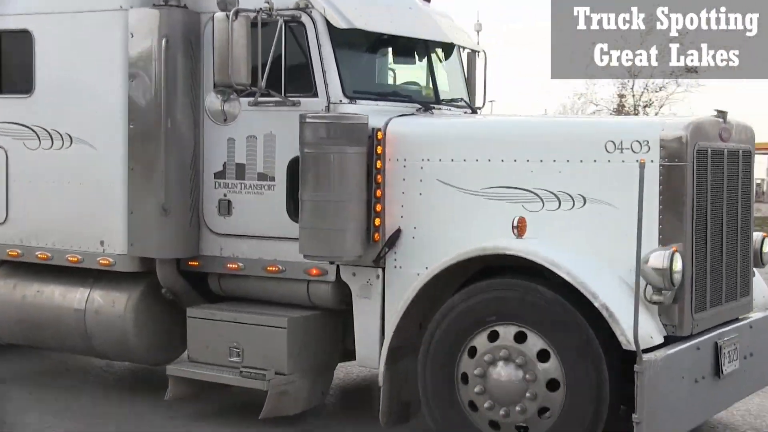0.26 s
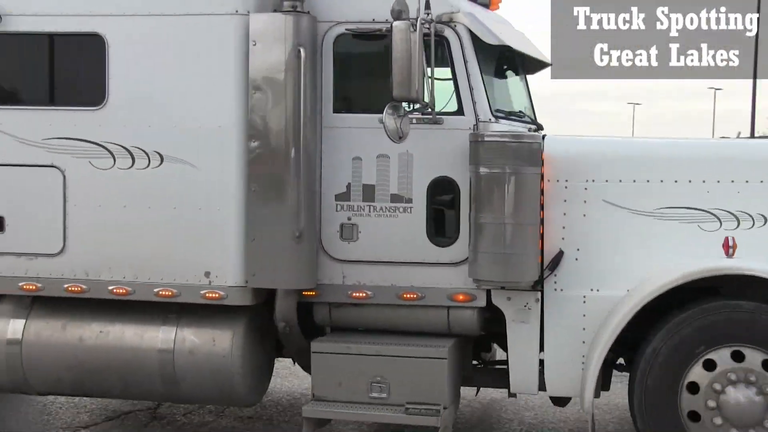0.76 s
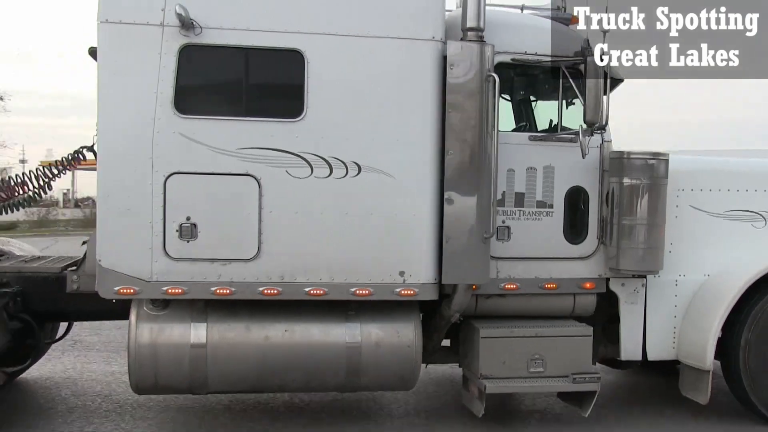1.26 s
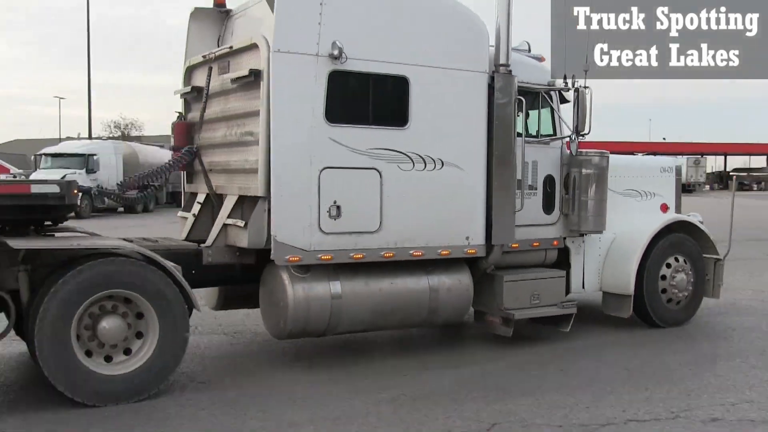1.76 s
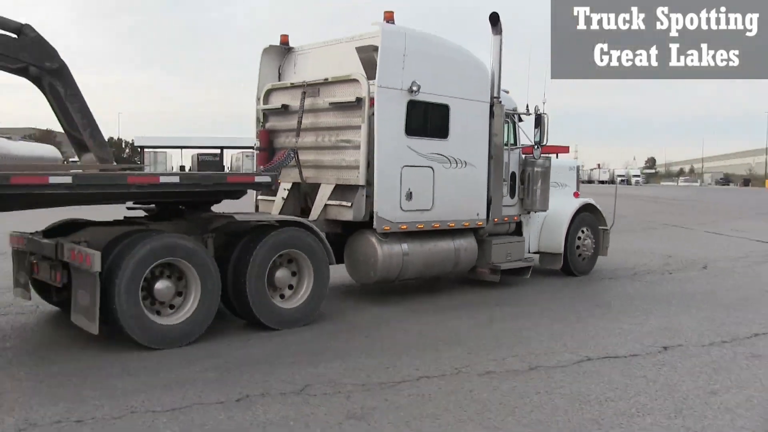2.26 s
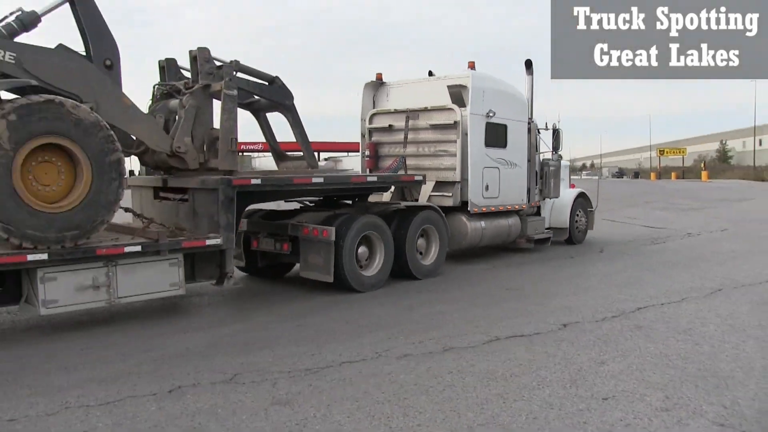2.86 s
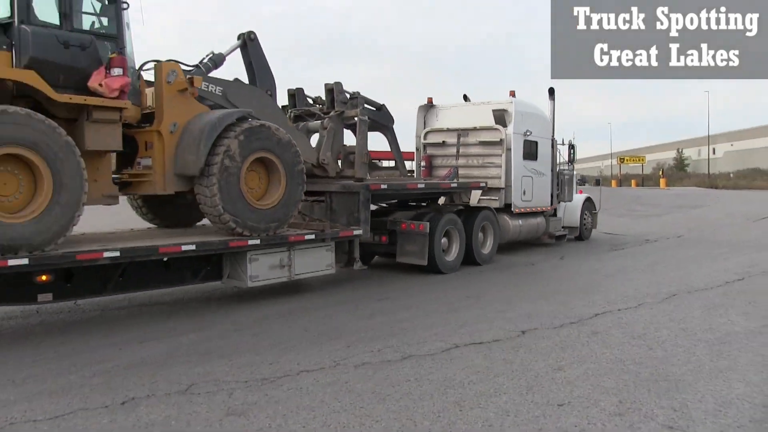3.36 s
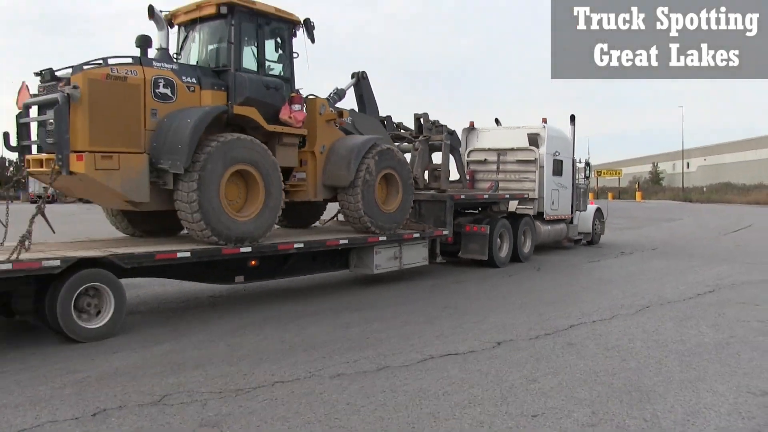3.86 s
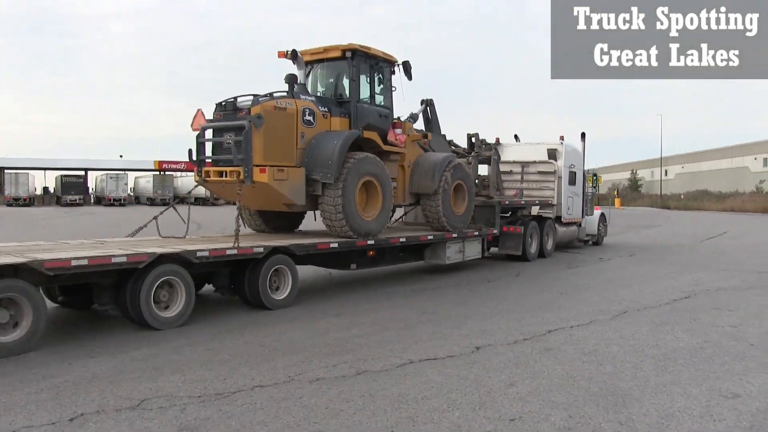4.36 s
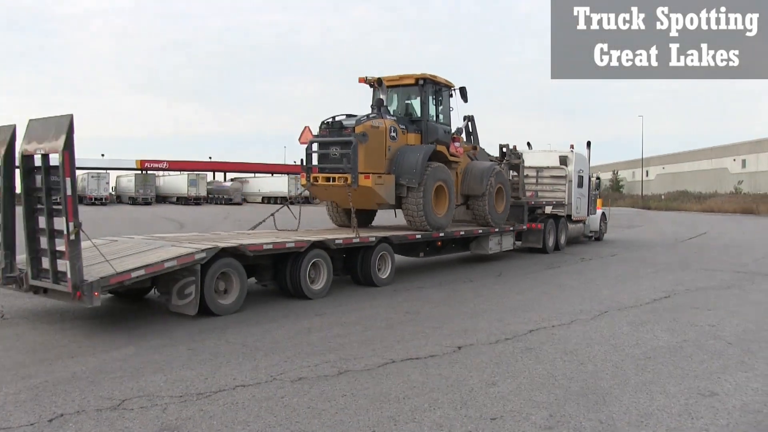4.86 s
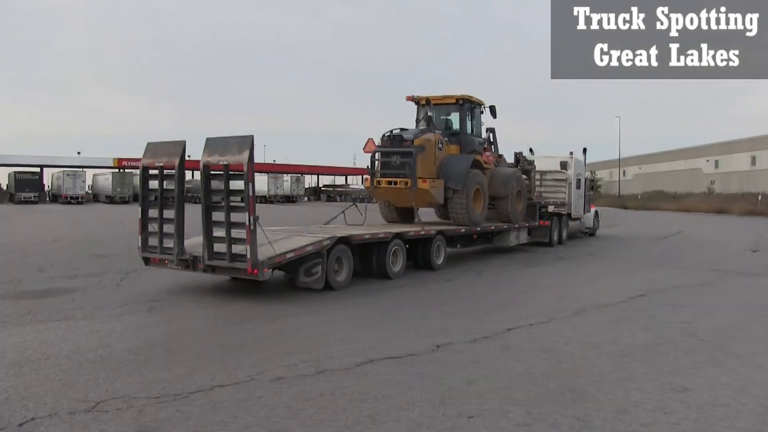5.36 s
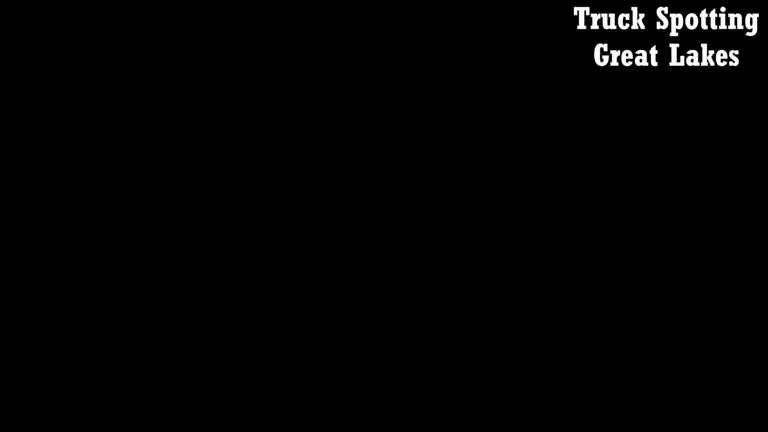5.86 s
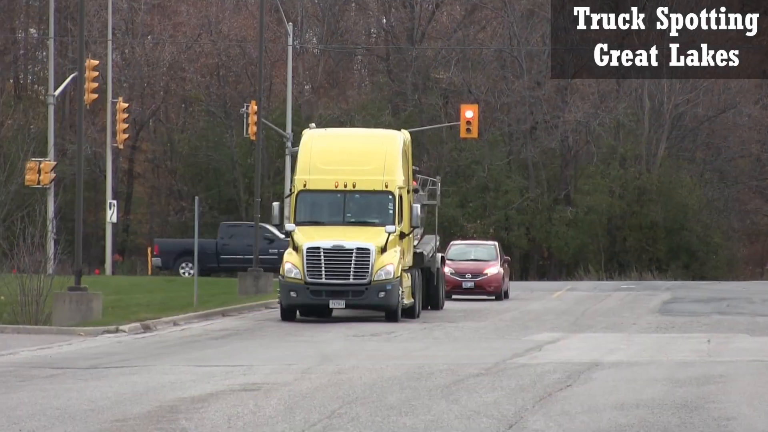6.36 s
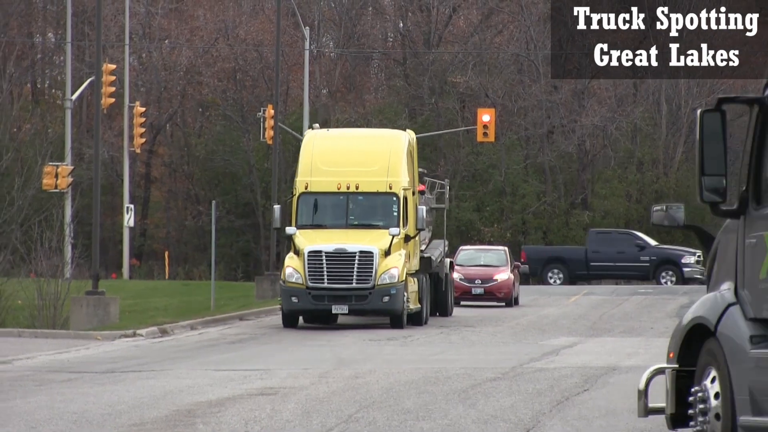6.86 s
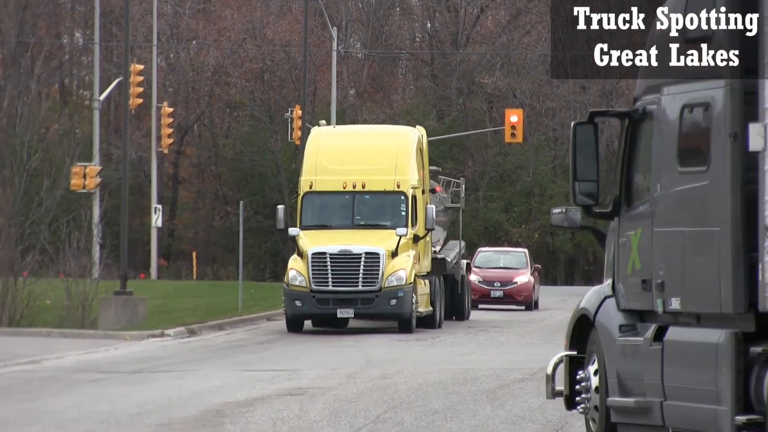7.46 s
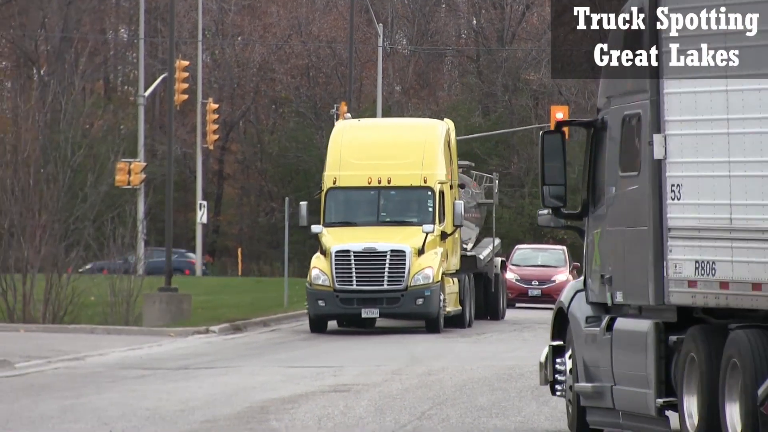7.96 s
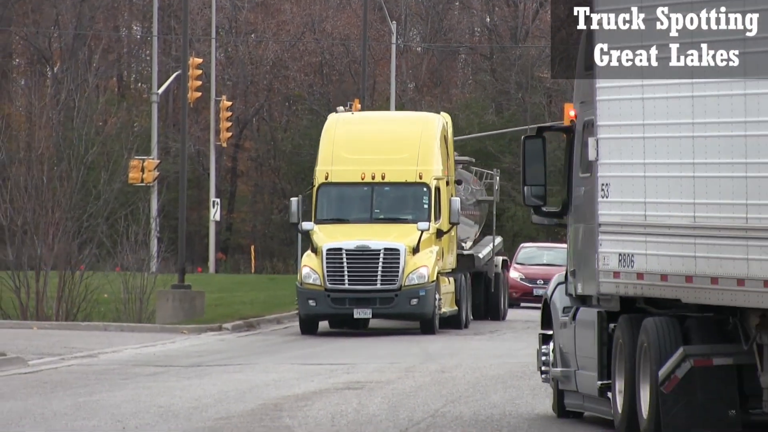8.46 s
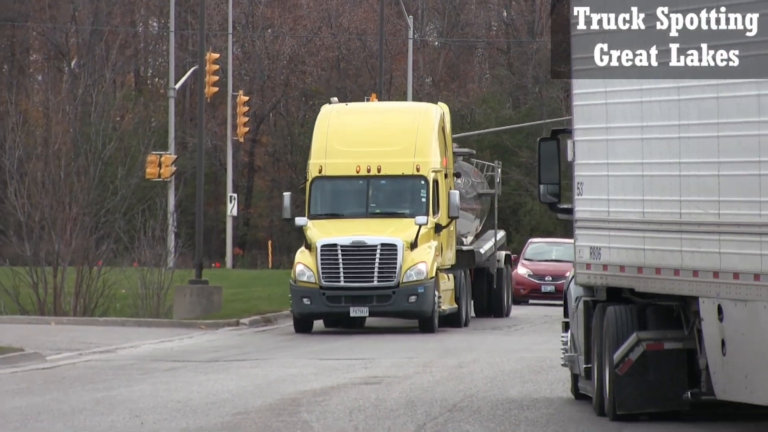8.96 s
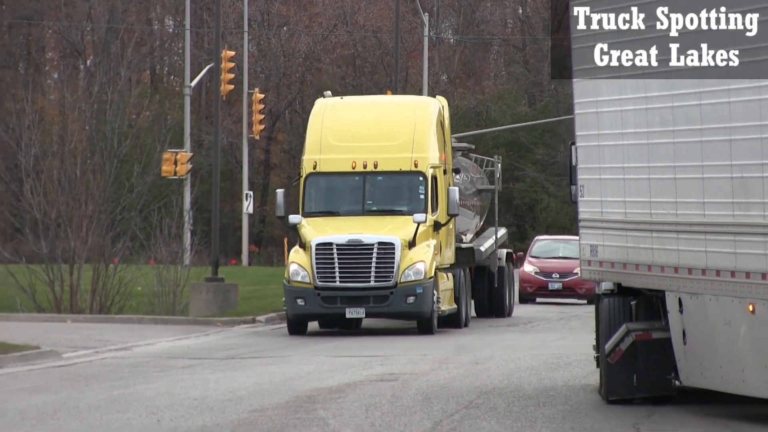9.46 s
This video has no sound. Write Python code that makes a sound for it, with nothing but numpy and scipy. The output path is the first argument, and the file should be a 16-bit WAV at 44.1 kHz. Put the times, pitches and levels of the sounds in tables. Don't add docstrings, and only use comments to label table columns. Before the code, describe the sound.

Outdoors in a paved yard, a close loaded diesel truck throbs and roars away with exhaust hum and gear whine. Two hard coupling clanks come early, then loose chains slap quickly on the left. The level dips, ticks and drops to total silence for a second, then returns with a roadside truck's hollow drone and idle. Dull small stereo microphone.

```python
import sys
import numpy as np
from scipy import signal
from scipy.io import wavfile
from scipy.ndimage import uniform_filter1d, minimum_filter1d

SR = 44100
rng = np.random.default_rng(int(sys.argv[2]) if len(sys.argv) > 2 else 0)


def makeup_ratio(level_db):
    decades = np.asarray(level_db, float) / 20
    return 10 ** decades


def store_pcm(level_fs):
    pcm = np.round(np.clip(level_fs, -1, 1) * 32767).astype(np.int16)
    wavfile.write(sys.argv[1], SR, np.atleast_2d(pcm).T)


N = 428211
DROPOUT_START_S, DROPOUT_END_S = 6.40235, 7.40235
DIP_START_S = 5.42


def evened(x):
    return x / np.sqrt(np.mean(x ** 2) + 1e-20)


def read(points, hz):
    f, value = np.transpose(points)
    return np.interp(np.log(hz + 1), np.log(f + 1), value)


def curves(rows, t):
    s, *columns = np.transpose(rows)
    return np.array([np.interp(t, s, c) for c in columns])


def add(mix, s, sound):
    part = mix[round(s * SR):][:len(sound)]
    part += sound[:len(part)]


def drift(size):
    return evened(uniform_filter1d(uniform_filter1d(rng.standard_normal(N), size), size))


def fuzzy_tone(hz, width):
    r = np.exp(-np.pi * width / SR)
    slow = rng.standard_normal(N) + 1j * rng.standard_normal(N)
    slow = signal.lfilter([1], [1, -2 * r, r * r], slow)
    carrier = np.exp(2j * np.pi * np.cumsum(hz * np.ones(N)) / SR)
    return evened((slow * carrier).real)


def panned(x, lean_db):
    return x * makeup_ratio(np.array([[.5], [-.5]]) * lean_db)


def echoing(t, db, fade_db, period, crest, share):
    with_echo = abs(1 + share * np.exp(2j * np.pi * (t - crest) / period)) / (1 + share)
    return makeup_ratio(db - fade_db * t) * np.sqrt(with_echo)


def firing():
    # t/s, f/Hz
    firing_rate = [(0, 45.66), (1.2, 44.93), (2.4, 44.92), (3.3, 44.8), (4.2, 43.84), (5.1, 43.98),
                   (5.7, 44.1), (6.4, 43.13)]
    hz = curves(firing_rate, np.arange(N) / SR)[0]
    wander = evened(uniform_filter1d(rng.standard_normal(N), 6000))
    return hz, np.cumsum(hz * (1 + 0.0016 * wander)) / SR


def kept_blocks(hz, t):
    edge_hz, spike_hz, scatter_hz = 6650, 450, 400
    later = np.maximum(t - DIP_START_S - .3, 0) ** 1.2 / 2
    groups = len(t) // 4 + 1
    column = np.repeat(rng.exponential(1, groups), 4)[:len(t)]
    blocks = np.repeat(np.repeat(rng.random((65, groups)), 8, 0), 4, 1)[:len(hz), :len(t)]
    edge = edge_hz + 220 * later + spike_hz * column * (1 + later)
    return blocks < np.exp(-(hz[:, None] - edge) / (scatter_hz + 640 * later))


def roar(turns):
    # f/Hz, level per Hz/dB
    near_colour = [(55, -26.5), (100, -15), (170, -6), (300, -2.5), (450, -12.5), (650, -15), (1000, -9),
                   (1700, -6.5), (2200, -22.5), (3200, -26.5), (3650, -28.5), (3950, -32.5), (6000, -44),
                   (7200, -55), (9000, -60.5)]
    far_colour = [(55, -13), (100, 0.5), (170, 1), (300, -1.5), (450, 0), (650, -7.5), (1000, -14),
                  (1700, -19.5), (2200, -23), (3200, -35), (3650, -43.5), (5500, -46), (7200, -54),
                  (9000, -57.5)]
    road_colour = [(55, -14.5), (100, -3), (200, -1), (350, -4.5), (600, -12.5), (1000, -11), (1750, -17),
                   (2150, -29), (3200, -36), (4000, -43), (6000, -51), (7200, -54.5), (9000, -60),
                   (15000, -61.5)]
    # t/s, distance gone [0-1], dissolve into the roadside [0-1],
    # depth of the firing throb [0-1], left-right lean of the rush/dB
    course = [
        (0, 0.17, 0.09, 0.2, -1),
        (1.1, 0.4, 0.04, 0.09, -1.4),
        (2.5, 0.62, 0.06, 0.03, 0),
        (4.2, 0.86, 0.45, 0.06, 0),
        (5.5, 0.73, 0, 0, 3),
        (6.1, 0.6, 0.8, 0, 0),
        (6.4, 0.6, 0.5, 0.09, 0),
        (8.3, 0.4, 0.7, 0.11, -0.5),
        (9.72, 1, 0.8, 0.1, 1.5),
    ]
    # t/s, level/dB
    loudness = [(0, -11), (.45, -11), (.7, -10), (1.7, -11), (2.2, -10.5), (2.9, -10.5), (3.5, -12.5),
                (4.4, -12), (5.4, -12.5), (6.3, -13), (7.44, -13), (7.55, -14.5), (8.1, -14), (8.5, -14),
                (8.9, -13), (9.2, -12), (9.71, -12.5)]
    # f/Hz, likeness [0-1]
    likeness = [(60, 0.85), (150, 0.91), (350, 1), (700, 0.74), (1400, 0.71), (2500, 0.5), (5000, 0.5),
                (9000, .6), (13000, .9)]
    # f/Hz, lean/dB
    balance = [(60, -1), (350, 1.1), (700, -2), (1400, -2), (3500, -1.5), (5500, -6), (9000, 3)]
    frames, hz = N // 256 + 5, np.fft.rfftfreq(1024, 1 / SR)
    t = np.arange(frames) * 256 / SR
    gone, dissolve, _, rush_lean_db = curves(course, t)

    near, far, road = (read(colour, hz)[:, None] for colour in (near_colour, far_colour, road_colour))
    yard = (1 - gone) * near + gone * far
    power = makeup_ratio((1 - dissolve) * yard + dissolve * road) ** 2
    notch_hz, notch_width_hz, notch_db = 676 + (960 - 676) * gone, 210, -3.5
    notch = np.exp(-((hz[:, None] - notch_hz) / notch_width_hz) ** 2)
    power = power * makeup_ratio(2 * notch_db * (0.5 - dissolve) * notch)
    power = power / power.sum(0)

    jolts = evened(uniform_filter1d(rng.standard_normal(frames), size=6))
    lift_db = curves(loudness, t)[0] + 0.52 * jolts
    a, b, c, d, patches = rng.standard_normal((frames, 513, 5)).T
    patches = uniform_filter1d(patches, size=8, axis=0)
    patches = evened(uniform_filter1d(patches, size=10, axis=1))

    same = np.clip(read(likeness, hz), -1, 1)[:, None]
    left = a + 1j * b
    right = same * left + np.sqrt(1 - same ** 2) * (c + 1j * d)
    z = np.array([left, right])
    in_rush = ((hz > 2100) & (hz < 3600))[:, None]
    lean_db = read(balance, hz)[:, None] + (0.27 + in_rush) * rush_lean_db
    z *= makeup_ratio(np.array([.5, -.5])[:, None, None] * lean_db)
    level_now = makeup_ratio(lift_db + 0.82 * patches) / np.sqrt(1 + same) * 1.46
    z *= kept_blocks(hz, t) * np.sqrt(power) * level_now
    noise = signal.istft(z, nperseg=1024, noverlap=768)[1]
    low_cut = signal.butter(3, 62, "highpass", fs=SR, output="sos")
    noise = signal.sosfiltfilt(low_cut, noise)[:, :N]
    depth = np.clip(curves(course, np.arange(N) / SR)[2], 0, 1)
    throb = np.cos(2 * np.pi * turns) + 0.21 * np.sin(4 * np.pi * turns)
    return noise * (1 + depth * throb)


def exhaust(turns):
    # multiple of the firing rate, level/dB, fade/(dB/s), swell period/s, t of a crest/s
    stack_tones = [(1, -39.5, 0.1, 6.2, .8), (3, -19.5, 0.26, 3.05, 1.5), (4, -21.5, 4.5, 1.3, 0.95),
                   (5, -18.5, 1.5, 1.1, 0.86), (7, -13.5, 5.5, 1.6, 0.92), (9, -22, 2, 2.2, 1.5)]
    t, tones = np.arange(N) / SR, np.zeros(N)
    for multiple, *swell in stack_tones:
        wave = np.sqrt(2) * np.cos(2 * np.pi * (multiple * turns + rng.random()))
        tones += echoing(t, *swell, share=1) * wave
    return panned(tones * (t < DROPOUT_START_S), .8)


def gears(hz):
    # multiple of the firing rate, level/dB, fade/(dB/s), swell period/s, t of a crest/s
    gear_whines = [(26.83, -27, .1, .92, 2.6), (40.8, -31.5, .1, 0.37, 2.35)]
    end_s, fade_s = 4.3, 0.99
    t, tones = np.arange(N) / SR, np.zeros(N)
    for multiple, *swell in gear_whines:
        whine = fuzzy_tone(hz * multiple, 54) + 0.5 * fuzzy_tone(hz * multiple, 4.8)
        tones += echoing(t, *swell, share=0.84) * whine
    return panned(tones * np.clip((end_s - t) / fade_s, 0, 1), -4.5)


def turbo():
    # t/s, f/Hz, level/dB
    whistle = [
        (0, 6390, -56.5),
        (1.0, 6050, -58.5),
        (1.8, 5910, -63.5),
        (2.4, 5850, -72),
    ]
    hz, db = curves(whistle, np.arange(N) / SR)
    return panned(makeup_ratio(db) * fuzzy_tone(hz, 160), -2)


def clanks():
    # t/s, blow level/dB, squeak level/dB, squeak f/Hz, squeak time to fall 60 dB/s
    coupling_clanks = [
        (1.565, -14.5, -31.5, 4350, 0.23),
        (1.588, -28, -34.5, 2900, 0.15),
        (1.655, -39, -44.5, 4920, .2),
        (1.7589, -16, -48, 4390, 0.16),
        (1.776, -26, -36, 4350, 0.092),
        (5.712, -26, -38, 5200, 0.07),
    ]
    blow_t60_s, glide_hz_per_s = 0.026, 4000
    t, out = np.arange(6000) / SR, np.zeros(N)
    dull = signal.butter(2, (1000, 3000), "bandpass", fs=SR)
    rise = np.clip(t / .001, 0, 1)
    for s, blow_db, squeak_db, hz, t60 in coupling_clanks:
        blow = evened(signal.lfilter(*dull, rng.standard_normal(len(t))))
        flutter = 1 + 0.49 * evened(uniform_filter1d(rng.standard_normal(len(t)), size=150))
        squeak = flutter * np.sin(2 * np.pi * (hz * t + glide_hz_per_s * t ** 2 / 2))
        dying_blow = makeup_ratio(blow_db - 60 * t / blow_t60_s) * blow
        dying_squeak = makeup_ratio(squeak_db - 60 * t / t60) * squeak
        add(out, s, rise * (dying_blow + dying_squeak))
    return panned(out, -2.0)


def chains():
    # t/s, peak level/dB
    slaps = [(3.969, -28), (4.054, -28), (4.147, -27), (4.234, -27.5), (4.323, -27), (4.417, -29),
             (4.507, -24.5), (4.596, -27), (4.68, -23.5), (4.769, -29), (4.851, -24.5), (4.946, -22.5),
             (5.0345, -21.5), (5.121, -23.5), (5.212, -21.5), (5.298, -20.5), (5.381, -24), (5.47, -24),
             (5.552, -19.5), (5.645, -18), (5.735, -21), (5.8221, -21), (5.913, -26), (6.0, -29),
             (6.081, -26), (6.17, -28), (6.26, -25)]
    # delay/s, level/dB
    link_knocks = [
        (0, 1),
        (.031, -3.5),
        (.06, -5),
    ]
    link_hz, link_spread, link_t60_s = 2320, .034, .075
    t, out = np.arange(3000) / SR, np.zeros(N)
    for s, db in slaps:
        for delay, link_db in link_knocks:
            late, loud, pitch, pair = rng.standard_normal(4)
            loose = delay > 0
            hz = link_hz * (1 + link_spread * pitch)
            second_hz = hz * (1.08 + 0.027 * pair)
            ring = np.sin(2 * np.pi * hz * t) + .5 * np.sin(2 * np.pi * second_hz * t)
            level_db = db + link_db + 1.5 * loud * loose - 60 * t / link_t60_s
            knock = makeup_ratio(level_db - 2.0) * ring * np.clip(t / .002, 0, 1)
            add(out, s + delay + 0.0029 * late * loose, knock)
    return panned(out, 13)


def passing_truck():
    # t/s, level/dB
    drone_level = [
        (5.9, -45.5),
        (6.4, -28.5),
        (7.4, -22.5),
        (8.15, -20.5),
        (8.45, -30),
        (9.71, -33.5),
    ]
    # f/Hz, width/Hz, level/dB
    cab_panels = [
        (3010, 230, -50),
        (4310, 260, -52.5),
        (4950, 220, -60),
    ]
    idle_hz, idle_width_hz, idle_db = 44.3, 1.7, -36
    t = np.arange(N) / SR
    back_on = t > DROPOUT_END_S
    drone = makeup_ratio(curves(drone_level, t)[0] + drift(size=1500)) * fuzzy_tone(830, 240)
    drone = drone * (t > drone_level[0][0])
    cab = sum(makeup_ratio(db + 1.6 * drift(size=1500)) * fuzzy_tone(hz, width) for hz, width, db in cab_panels)
    cab = cab * np.clip((9.1 - t) / 0.97, 0, 1) * back_on
    idle_middle = makeup_ratio(idle_db) * fuzzy_tone(idle_hz, idle_width_hz)
    idle_side = makeup_ratio(idle_db) * 0.35 * fuzzy_tone(idle_hz, idle_width_hz)
    idle = idle_middle + np.array([[1], [-1]]) * idle_side
    return panned(drone + cab, -2.5) + idle * back_on


def scene():
    hz, turns = firing()
    parts = exhaust(turns) + gears(hz) + turbo() + clanks() + chains() + passing_truck()
    dull = signal.butter(14, 7000, fs=SR, output="sos")
    return roar(turns) + signal.sosfilt(dull, parts)


def low_pass(x):
    return signal.sosfilt(signal.butter(12, 15600, fs=SR, output="sos"), x)


def record(dry):
    # t/s, level/dB
    stumbles = [
        (6.3215, -40),
        (6.335, -29.5),
        (6.351, -47.5),
    ]
    dip_fall_s, dip_db = 0.16, -3
    jump_s, jump_rise_s, jump_db = 6.315, 0.018, 6.5
    t = np.arange(N) / SR
    dip = dip_db * np.clip((t - DIP_START_S) / dip_fall_s, 0, 1)
    jump = jump_db * np.clip((t - jump_s) / jump_rise_s, 0, 1)
    dry = dry * makeup_ratio((dip + jump) * (t < DROPOUT_START_S))
    ticks = np.zeros(N)
    for s, db in stumbles:
        add(ticks, s, makeup_ratio(db) * np.array([1., -1.]))
    room = np.minimum(.985 / (abs(dry).max(0) + 1e-9), 1)
    room = minimum_filter1d(room, size=301)
    limited = dry * uniform_filter1d(uniform_filter1d(room, size=150), size=150)
    on = (t < DROPOUT_START_S) | (t >= DROPOUT_END_S)
    return low_pass((limited + ticks) * on)


dry = scene()
out = record(dry)
store_pcm(out)
```